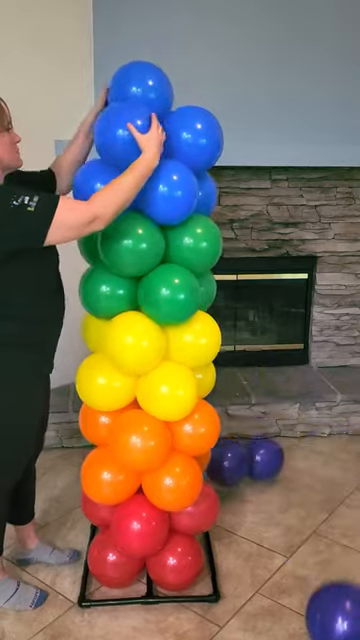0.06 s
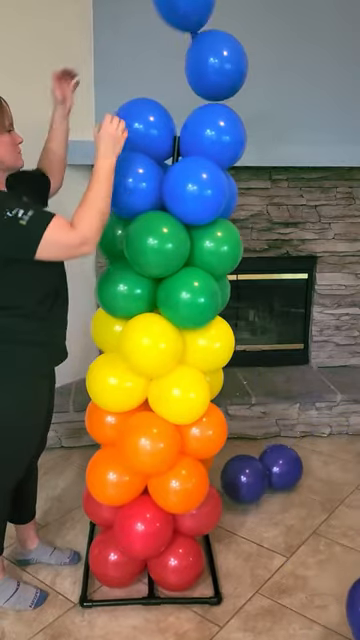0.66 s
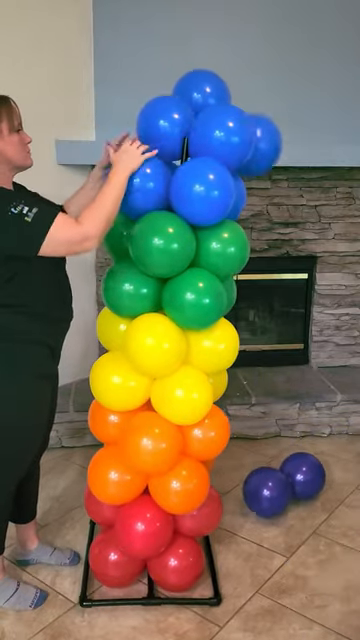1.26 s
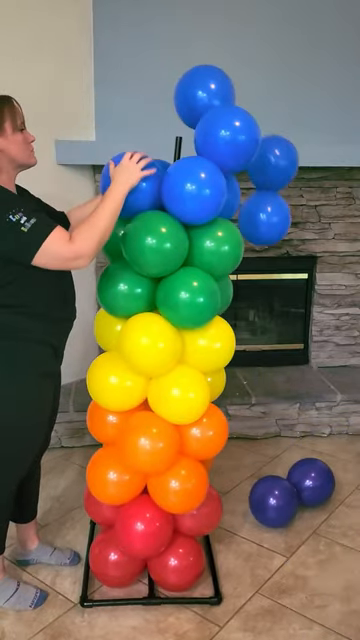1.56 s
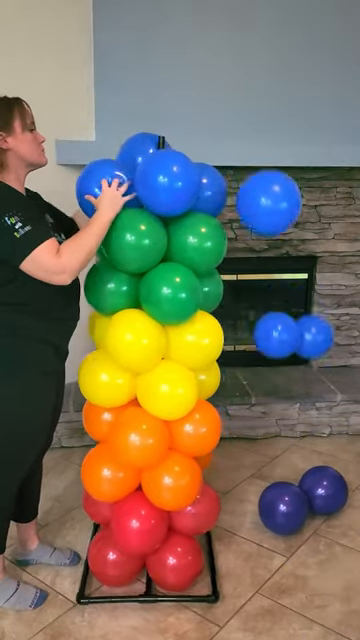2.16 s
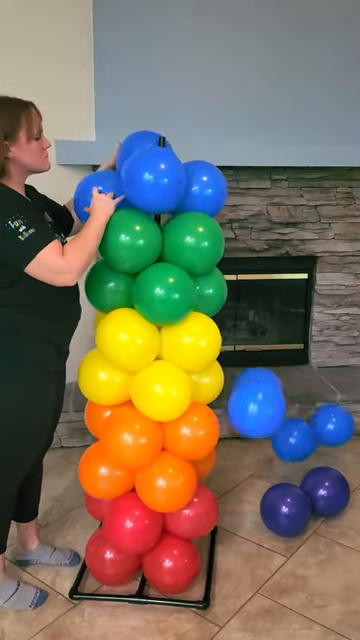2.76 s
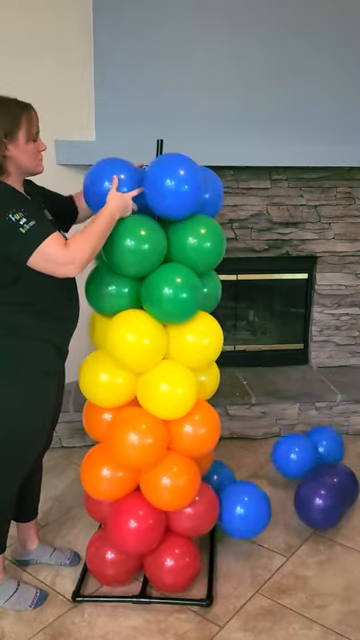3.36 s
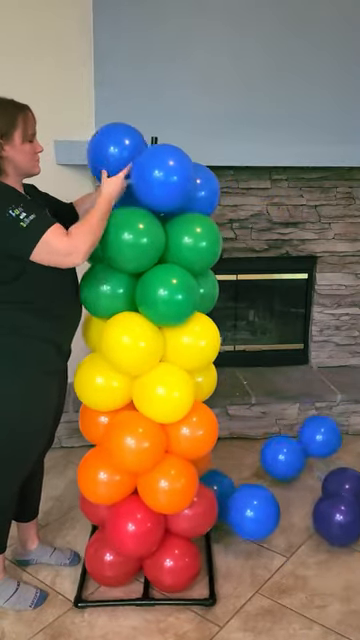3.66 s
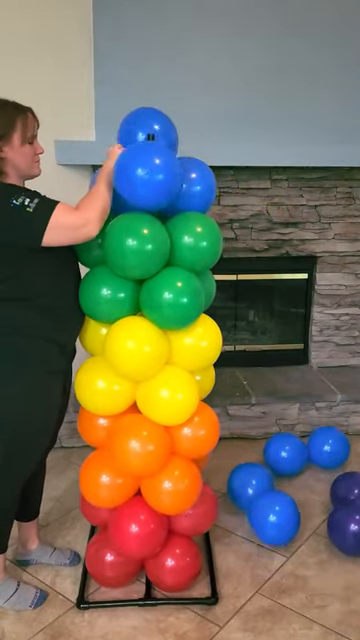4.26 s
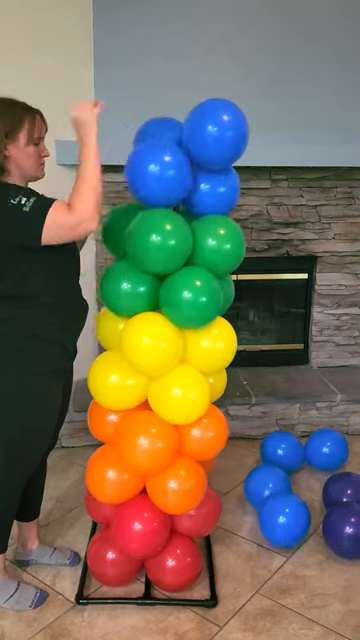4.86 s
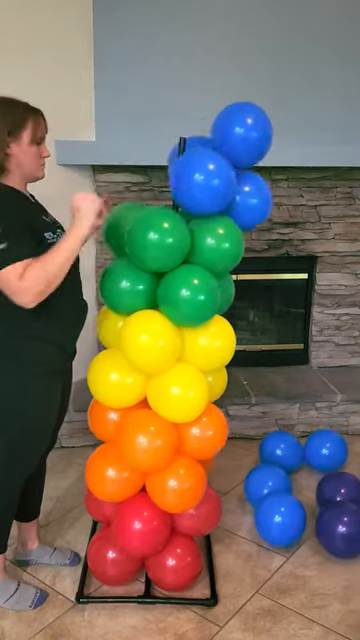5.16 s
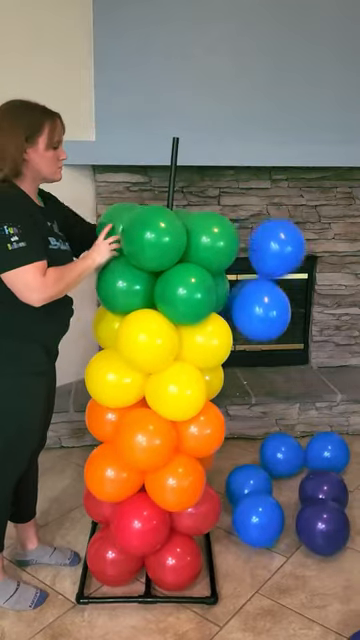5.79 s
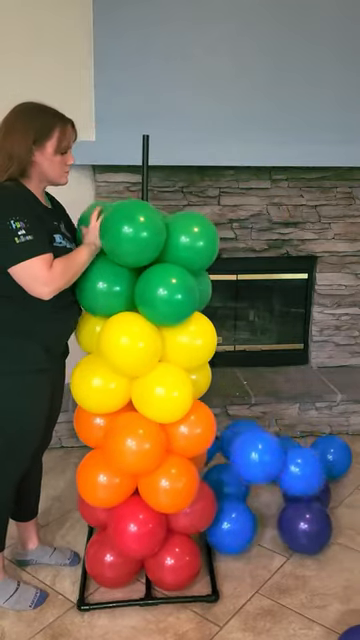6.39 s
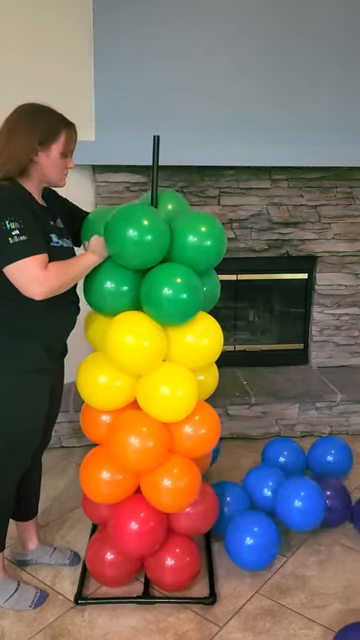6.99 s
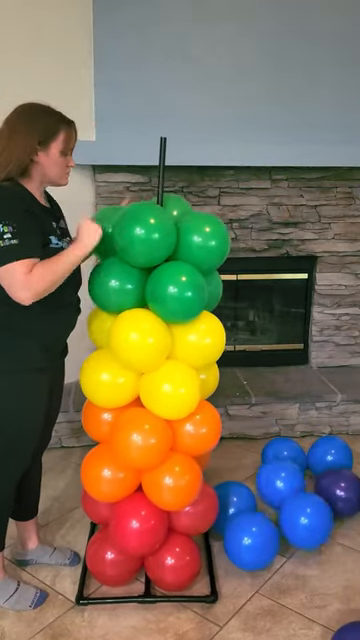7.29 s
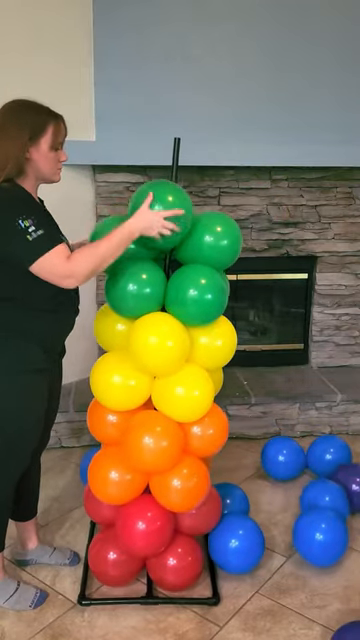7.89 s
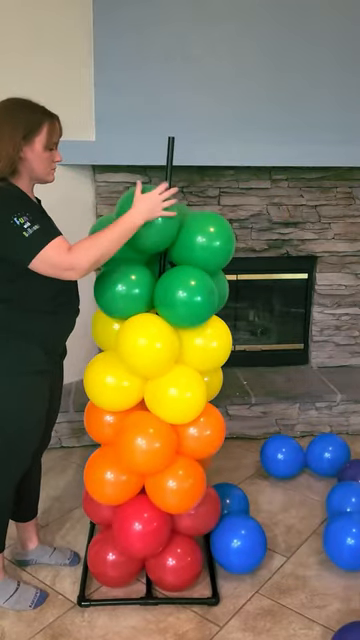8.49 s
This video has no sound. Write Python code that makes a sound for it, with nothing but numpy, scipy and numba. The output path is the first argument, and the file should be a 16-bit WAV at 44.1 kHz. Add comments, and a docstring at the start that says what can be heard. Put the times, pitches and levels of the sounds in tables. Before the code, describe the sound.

Inflated latex balloons are worked off a pole in a ringing tiled room. They rub in short, boomy, rasping strokes, with an early sharp snap and knocks. After a lull the rubbing builds, with hissing hand slides, thin squeaks and a loud low groan. It eases, then returns with a hard juddering pull. A faint appliance hum runs underneath, and the microphone hears plenty of the room.

```python
"""Balloons worked off a pole

Clusters of inflated latex balloons are worked up and off a pole in a tiled living room. Skin sticks
and slips on skin: the slips boom in the balloons, rasp on the latex and now and then lock into a groan
or squeak. Hands brush the skins, balloons wobble, snap free and knock, taut patches scrape and the
hardest pull judders. The room rings with it all, and an appliance hums underneath."""
import sys
import numpy as np
from scipy import signal
from scipy.fft import rfft, irfft
from scipy.io import wavfile
from scipy.ndimage import uniform_filter1d
from numba import njit

SR = 44100
rng = np.random.default_rng(int(sys.argv[2]) if len(sys.argv) > 2 else 0)


def persist_wave(psi):
    """Save psi, clipped to +-1, as 16-bit WAV."""
    counts = np.round(np.clip(psi, -1, 1) * 32767).astype(np.int16)
    wavfile.write(sys.argv[1], SR, np.atleast_2d(counts).T)


N = 376613
T = np.arange(N) / SR


def undb(db):
    """Decibels to gain."""
    return np.exp(np.asarray(db) * np.log(10) / 20)


def unit_rms(x):
    """Scale to rms 1."""
    return x / np.sqrt(np.mean(x ** 2))


def steady(x, window=2200):
    """Hold the short-term rms near 1 and keep the grain."""
    power = uniform_filter1d(uniform_filter1d(x ** 2, window), window)
    return x / np.sqrt(np.abs(power) + 1e-12)


def wander(hz):
    """Random drift with a spread near 1, turning hz times a second."""
    return np.interp(T * hz, np.arange(N // 10), rng.standard_normal(N // 10))


def add(out, start_s, sound):
    """Mix a sound in at a time."""
    i = int(start_s * SR)
    out[i:i + len(sound)] += sound[:N - i]


def swell(start_s, length_s):
    """Half-sine envelope: the skin speeds up and slows down."""
    out = np.zeros(N)
    add(out, start_s, np.sin(np.pi * T[:int(length_s * SR)] / length_s))
    return out


def along(points, hz):
    """Read (freq_hz, value) points on a log-frequency axis."""
    freq_hz, value = np.transpose(points)
    return np.interp(np.log(np.maximum(hz, 1)), np.log(freq_hz), value)


def colour(x, eq, size=2048):
    """Filter by an EQ curve, as a minimum-phase impulse response of energy 1."""
    gain = undb(along(eq, np.fft.rfftfreq(size, 1 / SR)))
    cepstrum = irfft(np.log(gain))
    cepstrum[1:size // 2] *= 2
    cepstrum[size // 2 + 1:] = 0
    impulse = irfft(np.exp(rfft(cepstrum)))
    return signal.fftconvolve(x, impulse / np.linalg.norm(impulse))[:N]


def soften(x, hz):
    """Second-order low-pass."""
    return signal.sosfilt(signal.butter(2, min(hz, SR / 3), fs=SR, output="sos"), x)


@njit
def resonate(x, hz, width_hz):
    """One resonance with a moving centre, gain 1 there."""
    out, band, low = np.empty(len(x)), 0., 0.
    for i in range(len(x)):
        tuning, damping = np.tan(np.pi * hz[i] / SR), width_hz / hz[i]
        v = (band + tuning * (x[i] + 1e-18 - low)) / (1 + tuning * (tuning + damping))
        band, low = 2 * v - band, low + 2 * tuning * v
        out[i] = damping * v
    return out


def stroke(t, attack_s, hold_s, sag_db_per_s=12, release_db_per_s=420):
    """Envelope of one rub: the skin bites, eases while it is dragged, then lets go."""
    bite = np.sin(np.pi / 2 * np.minimum(t / attack_s, 1))
    released_s = np.maximum(t - attack_s - hold_s, 0)
    return bite * undb(-sag_db_per_s * t - release_db_per_s * released_s)


# Light contact on the column of balloons, easing as each cluster flies: time_s, boom_db, hiss_db
HANDLING = [(0.0, -42.5, -51.5), (0.56, -38.5, -56.5), (0.92, -56.5, -67), (1.11, -60.5, -75),
            (1.59, -51.0, -67), (1.63, -64.0, -87), (2.13, -50.0, -53.5), (2.98, -45.5, -67),
            (3.38, -48.0, -60.0), (3.84, -38.0, -53.5), (4.88, -45.0, -56.5), (5.27, -63, -84),
            (5.62, -63.5, -70), (5.66, -69.0, -88.5), (6.28, -38.5, -57.0), (6.96, -45.0, -62.0),
            (7.5, -54.5, -77.5), (7.88, -44.0, -54.5), (8.5, -46.0, -60)]
# A balloon is dragged over its neighbour: start_s, attack_s, hold_s, boom_db, rasp_db
STROKES = [(0.0, 0.004, 0.17, -32.0, -40), (0.183, 0.03, 0.036, -35.0, -47),
           (0.293, 0.029, 0.0076, -32.0, -43), (0.409, 0.027, 0.019, -35, -42),
           (0.646, 0.032, 0.16, -47.5, -59), (1.1, 0.05, 0.07, -48, -70),
           (1.366, 0.022, 0.062, -49.0, -53.5), (1.768, 0.025, 0.17, -56.5, -55),
           (2.029, 0.046, 0.044, -34.0, -40), (2.141, 0.027, 0.15, -41.5, -40.5),
           (2.348, 0.042, 0.051, -38.5, -41.5), (2.723, 0.036, 0.09, -39.0, -42.5),
           (3.058, 0.026, 0.009, -34.5, -40.5), (3.128, 0.021, 0.013, -40.0, -43.5),
           (3.268, 0.021, 0.0052, -40.0, -45), (3.408, 0.028, 0.12, -37.0, -39.5),
           (3.606, 0.044, 0.053, -33.0, -35), (3.799, 0.039, 0.049, -37.0, -40),
           (3.9, 0.025, 0.047, -30, -34), (4.009, 0.028, 0.029, -29.5, -34),
           (4.059, 0.023, 0.022, -31, -34), (4.119, 0.024, 0.042, -34.5, -44),
           (4.344, 0.036, 0.022, -40.5, -40), (4.485, 0.051, 0.03, -41.0, -35.5),
           (4.531, 0.025, 0.027, -31.5, -37.5), (4.636, 0.022, 0.11, -37.5, -42),
           (5.96, 0.08, 0.067, -45.5, -46.5), (6.14, 0.075, 0.045, -33.5, -37.5),
           (6.402, 0.035, 0.045, -35.0, -37), (6.48, 0.033, 0.024, -30.5, -37),
           (6.732, 0.046, 0.031, -29.0, -31.5), (6.862, 0.03, 0.035, -30.0, -29),
           (6.945, 0.026, 0.016, -32.0, -38.5), (6.996, 0.034, 0.047, -39.0, -41.0),
           (7.255, 0.036, 0.03, -37.5, -45), (7.741, 0.082, 0.025, -34, -42),
           (7.842, 0.026, 0.035, -29, -27.5), (7.945, 0.032, 0.025, -31, -42.5),
           (8.418, 0.045, 0.0062, -30, -32.0)]
# A hand glides over a skin: start_s, length_s, hiss_db
HAND_SLIDES = [(0.097, 0.05, -50), (0.47, 0.15, -49.5), (1.301, 0.17, -59.5), (1.742, 0.22, -62.5),
               (2.033, 0.38, -47.5), (2.46, 0.15, -56), (2.758, 0.13, -61), (2.989, 0.19, -52.0),
               (3.422, 0.34, -45.5), (4.109, 0.39, -53), (4.52, 0.2, -47.5), (4.799, 0.047, -44.0),
               (4.953, 0.09, -57.5), (5.9, 0.36, -59.5), (6.348, 0.23, -50), (6.67, 0.28, -50),
               (7.139, 0.16, -61), (7.73, 0.2, -48.5), (8.121, 0.31, -60), (8.449, 0.13, -53.5)]
def friction(rasp_vs_boom_db=-5.5, hiss_vs_rasp_db=-25):
    """Envelopes of boom, rasp and hiss: handling, strokes and hand slides add in power."""
    time_s, *levels = np.transpose(HANDLING)
    touch_db, brush_db = (np.interp(T, time_s, db) for db in levels)
    boom, rasp, hiss = undb([touch_db, touch_db + rasp_vs_boom_db, brush_db]) ** 2
    for start_s, attack_s, hold_s, boom_db, rasp_db in STROKES:
        grip = stroke(T[:SR], attack_s, hold_s)
        add(boom, start_s, (grip * undb(boom_db)) ** 2)
        add(rasp, start_s, (grip * undb(rasp_db)) ** 2)
        add(hiss, start_s, (grip * undb(rasp_db + hiss_vs_rasp_db)) ** 2)
    for start_s, length_s, hiss_db in HAND_SLIDES:
        hiss += (swell(start_s, length_s) * undb(hiss_db)) ** 2
    return np.sqrt([boom, rasp, hiss])


def slip_rate(force, firm_hz=204.58, firm_db=-33, db_per_octave=70, groan_below_hz=700):
    """Slip rate and unevenness: faster under a firmer rub, nearly even on the pitch of a groan."""
    hz = firm_hz * 2 ** ((20 * np.log10(force) - firm_db) / db_per_octave)
    uneven = np.full(N, .33)
    for start_s, length_s, start_hz, end_hz, *_ in SQUEALS:
        if start_hz < groan_below_hz:  # only low tones take the whole contact along
            on = (T >= start_s) & (T < start_s + length_s)
            hz[on] = np.linspace(start_hz, end_hz, on.sum())
            uneven[on] = .1
    return hz, uneven


def slips(hz, uneven, scatter_db, count=4000):
    """One pulse per slip; an uneven grip scatters both the waits and the sizes."""
    pulses, now_s = np.zeros(N), 0
    for wait, size in rng.standard_normal((count, 2)):
        i = min(int(now_s * SR), N - 1)
        now_s += np.exp(uneven[i] * wait) / hz[i]
        at = int(round(now_s * SR))
        if at < N:
            pulses[at] += undb(scatter_db * np.sqrt(uneven[i]) * size)
    return pulses


def squeeze(depth=.04, rate_hz=9):
    """Drifting pitch ratio: squeezing a balloon shifts its resonances."""
    return 1 + depth * wander(rate_hz)


# Body resonances of the balloons: pitch_hz, width_hz, gain_db
BALLOON_MODES = [(74, 5.4, 4), (150, 49, 0), (266, 13.7, 0.5), (310, 49, 2.5), (384.5, 45, 5.5),
                 (450.7, 17, -2.5), (565, 630, -38), (745, 33, -5.5)]
# Midrange rasp of rubbed latex: freq_hz, gain_db
RASP_EQ = [(350, -24.5), (600, 5.5), (900, 5), (1150, -1.5), (1600, -5), (2300, -9), (3200, -16),
           (4800, -19.5), (14000, -45.5)]
# Bright hiss of sliding latex: freq_hz, gain_db
HISS_EQ = [(1200, -20), (2500, 9), (3800, 6), (5200, 4.5), (7000, 3), (9000, -3), (11000, 3), (12500, 6),
           (14000, -2), (16000, -3.5)]
def rubbing(slide_s=.0011, boom_cutoff_hz=850, rasp_trim_db=.5, hiss_trim_db=2):
    """Slips ring the balloons and rasp the skin; between them the sliding latex hisses."""
    boom_gain, rasp_gain, hiss_gain = friction()
    pulses = slips(*slip_rate(boom_gain), scatter_db=5.5)
    # each slip slides on for a moment, tearing many tiny contacts
    sliding = signal.lfilter([1], [1, -np.exp(-1 / (slide_s * SR))], pulses)
    grit = unit_rms(sliding * rng.standard_normal(N))
    body = sum(undb(gain_db) * resonate(pulses, pitch_hz * squeeze(), float(width_hz))
               for pitch_hz, width_hz, gain_db in BALLOON_MODES)
    boom = soften(body, boom_cutoff_hz)
    rasp = colour(unit_rms(pulses) + grit, RASP_EQ)
    hiss = colour(grit + rng.standard_normal(N), HISS_EQ)
    spurts = undb(3 * wander(55))  # the contact catches and lets go
    return (steady(boom) * boom_gain
            + steady(rasp * spurts) * rasp_gain * undb(rasp_trim_db)
            + steady(hiss * spurts) * hiss_gain * undb(hiss_trim_db))


def appliance_hum(pitch_hz=120, rms_db=-50.3, waver_db=1.6):
    """An appliance's mains hum, wavering a little in level."""
    return np.sqrt(2) * np.sin(2 * np.pi * pitch_hz * T) * undb(rms_db + waver_db * wander(15))


# Soft, bass-heavy room tone: freq_hz, gain_db
AIR_EQ = [(25, -26), (36, 1), (50, -2.5), (68, -1), (95, -5), (200, -7.5), (330, -5), (550, -22.5),
          (1000, -27), (3000, -49.5), (6000, -39), (9000, -44.5), (12300, -35.5), (15500, -52)]
def room_air(mid_db=-54.5, wide_above_hz=450):
    """A stereo bed of air, its bass alike in both ears."""
    mid, side = (colour(rng.standard_normal(N), AIR_EQ) * undb(.5 * wander(22)) for _ in range(2))
    side = signal.sosfilt(signal.butter(1, wide_above_hz, "high", fs=SR, output="sos"), side)
    return undb(mid_db) * np.array([mid + side, mid - side])


# Low thumps as the column is jolted: start_s, pitch_hz, level_db, t60_s
THUMPS = [(0.123, 68.5, -29, 0.35), (0.446, 72, -28, 0.25), (0.446, 155, -22, 0.095), (3.69, 64, -35, 0.3),
          (4.012, 290, -23, 0.2), (4.91, 66.6, -37, 0.22), (6.525, 68, -34, 0.26),
          (7.618, 150, -30.5, 0.17), (7.775, 62.2, -33.5, 0.42), (7.868, 77.92, -31.5, 0.57)]
def thumps(rise_s=.003):
    """Big soft skins wobble: low sines that swell within a cycle and die away."""
    out, t = np.zeros(N), T[:SR]
    for start_s, pitch_hz, level_db, t60_s in THUMPS:
        envelope = (1 - np.exp(-t / rise_s)) * undb(level_db - 60 * t / t60_s)
        add(out, start_s, np.sin(2 * np.pi * pitch_hz * t) * envelope)
    return out


def slap(flutter_gain, flutter_s):
    """A sharp blow, then a brief flutter of the slapping skin; energy 1."""
    t = T[:SR // 10]
    flutter = rng.standard_normal(len(t)) * np.exp(-t / flutter_s)
    push = (t == 0) + flutter_gain * flutter / np.linalg.norm(flutter)
    return push / np.linalg.norm(push)


# Skin snaps free: start_s, level_db
SNAPS = [(.423, -15), (.428, -6)]
def snaps():
    """Stuck latex peels off with a short bright tick."""
    out = np.zeros(N)
    for start_s, level_db in SNAPS:
        add(out, start_s, undb(level_db) * slap(flutter_gain=.39, flutter_s=.0066))
    return colour(out, HISS_EQ)


# Tone of a balloon knock: freq_hz, gain_db
KNOCK_EQ = [(100, -26), (260, -1), (450, -3), (900, -3), (1900, -2.5), (3200, -8.5), (4400, -9.5),
            (6000, -20), (15000, -34)]
# Balloons knock together: start_s, level_db, cutoff_hz
KNOCKS = [(.434, -5, 450), (.464, 2, 4200), (.471, -6, 4000), (2.735, -10, 1000), (3.067, -8, 1300),
          (3.303, -6.5, 1300), (3.44, -5, 1900), (4.906, -4.5, 1300), (5.562, -24.5, 1300),
          (6.947, -6, 1500), (7.066, -9, 1400), (7.162, -10.5, 1100), (8.436, -6.5, 900)]
def knocks():
    """Skin meets skin; a lower cutoff makes a softer, duller blow."""
    out = np.zeros(N)
    for start_s, level_db, cutoff_hz in KNOCKS:
        blow = slap(flutter_gain=.7, flutter_s=.006)
        add(out, start_s, undb(level_db) * soften(blow, cutoff_hz))
    return colour(out, KNOCK_EQ)


# Low groans, and high squeaks from small taut patches:
# start_s, length_s, start_hz, end_hz, level_db, octave_gain_db, waver_ratio
SQUEALS = [(2.13, .14, 2380, 2560, -50, -14, .03), (3.92, .155, 368, 364, -17.5, -23, .02),
           (4.06, .06, 560, 500, -27, -18, .16), (4.635, .07, 3300, 3480, -45.5, -12, .03),
           (4.793, .042, 3500, 4150, -42, -8, .035), (4.96, .08, 8200, 7900, -59, -30, .07),
           (6.19, .17, 440, 480, -41, -12, .1), (6.775, .04, 440, 415, -29, -22, .05),
           (8.445, .09, 428, 415, -28, -18, .05)]
def squeals():
    """Locked stick-slip: a gliding tone and its octave, unsteady in pitch and strength."""
    out = np.zeros(N)
    jitter, grip = wander(400), undb(1.8 * wander(90))
    for start_s, length_s, start_hz, end_hz, level_db, octave_gain_db, waver_ratio in SQUEALS:
        on = (T >= start_s) & (T < start_s + length_s)
        progress = (T[on] - start_s) / length_s
        glide_hz = start_hz + (end_hz - start_hz) * progress
        phase = 2 * np.pi * np.cumsum(glide_hz * (1 + waver_ratio * jitter[on])) / SR
        tone = np.sin(phase) + undb(octave_gain_db) * np.sin(2 * phase)
        out[on] += undb(level_db) * np.sin(np.pi * progress) * grip[on] * tone
    return out


# Short, gritty scrapes: start_s, length_s, centre_hz, level_db
SCRAPES = [(3.61, .045, 4400, -37), (4.055, .055, 2100, -35.5), (4.525, .08, 1900, -47),
           (4.77, .04, 2700, -52), (7.845, .05, 3900, -41)]
def scrapes(slips_per_s=1200, width_ratio=.6):
    """Dense tiny slips ring a small taut patch of latex."""
    grit = (rng.random(N) < slips_per_s / SR) * rng.standard_normal(N)
    out, bend = np.zeros(N), squeeze()
    for start_s, length_s, centre_hz, level_db in SCRAPES:
        patch = resonate(grit, centre_hz * bend, float(width_ratio * centre_hz))
        out += steady(soften(patch, 1.5 * centre_hz)) * swell(start_s, length_s) * undb(level_db)
    return out


# Low-mid body of one heavy jerk: freq_hz, gain_db
JUDDER_EQ = [(140, -16), (240, 2), (440, 1), (600, -16), (950, -16), (2500, -36), (9000, -55)]
def judder(start_s=7.805, length_s=.205, rate_hz=220, level_db=-24, wobble_hz=74, wobble_db=6):
    """The hardest pull: a big skin slips in nearly even jerks as the column's wobble works the grip."""
    pulses = slips(np.full(N, rate_hz), uneven=np.full(N, .028), scatter_db=10)
    grip = undb(wobble_db * np.sin(2 * np.pi * wobble_hz * T))
    jerks = colour(pulses * grip, JUDDER_EQ)
    return steady(jerks) * swell(start_s, length_s) * undb(level_db)


# Decay time of the tiled room: freq_hz, t60_s
ROOM_DECAY = [(100, 0.5), (400, 0.7), (3000, 0.62), (14000, 0.43)]
def room_tail(predelay_s=.0015, build_s=.0036, near_wall_gain=.94, near_wall_s=.012):
    """Spectrum of one diffuse tail: strong echoes from near walls, then each band dies at its own rate."""
    t, hz = T[:SR], np.fft.rfftfreq(SR, 1 / SR)
    centres = np.geomspace(60, 16000, 5)
    build = 1 - np.exp(-np.maximum(t - predelay_s, 0) / build_s)
    onset = build * (1 + near_wall_gain * np.exp(-t / near_wall_s))
    noise, tail = rfft(rng.standard_normal(SR)), 0
    for centre, weights in zip(centres, np.eye(len(centres))):
        fade = onset * undb(-60 * t / along(ROOM_DECAY, centre))
        band = irfft(noise * along(np.column_stack([centres, weights]), hz))
        tail = tail + band * fade / np.linalg.norm(fade)
    return rfft(tail)


# Reverb level against the direct sound: freq_hz, wet_db
ROOM_WET = [(70, -1), (200, 2), (400, -4), (1000, 7), (4000, 8.5)]
# Stereo balance: freq_hz, left_minus_right_db
BALANCE = [(120, -1), (300, -2.5), (2000, 0), (9000, -4)]
def tiled_room(x, facing, facing_db=-7, right_lag_s=.0001, wide_above_hz=350):
    """Direct sound, with extra from sources facing the listener, then the ring of tile and stone."""
    hz = np.fft.rfftfreq(SR, 1 / SR)
    ears = np.array([[1], [-1]])  # left, right
    wet = undb(along(ROOM_WET, hz))
    gain = undb(ears * along(BALANCE, hz) / 2) / np.sqrt(1 + wet ** 2)
    lead = SR // 100  # samples of space for the filters' pre-ring

    def hear(source, paths):
        """Carry a source to both ears."""
        impulse = np.roll(irfft(paths * gain), lead, axis=1)
        return signal.fftconvolve(source[None], impulse, axes=1)[:, lead:lead + N]

    direct = np.exp(-2j * np.pi * hz * right_lag_s * (ears < 0))
    out = hear(x + undb(facing_db) * facing, direct)
    alike = 1 / (1 + (hz / wide_above_hz) ** 4)  # long waves reach both ears alike
    # the sound wanders among four balloons, each with its own echoes
    places = np.array([wander(35) for _ in range(4)])
    for share in places / np.linalg.norm(places, axis=0):
        mid = room_tail() * np.sqrt((1 + alike) / 2)
        side = room_tail() * np.sqrt((1 - alike) / 2)
        out += hear(x * share, wet * (mid + ears * side))
    return out


def scene():
    """All the balloon sounds share one room, over a bed of hum and air."""
    facing = knocks() + snaps() + squeals() + scrapes()
    balloons = rubbing() + judder() + thumps() + facing
    return tiled_room(balloons, facing) + appliance_hum() + room_air()


def record(dry, cutoff_hz=15800):
    """A steep low-pass takes off the very top."""
    return signal.sosfilt(signal.ellip(10, .2, 70, cutoff_hz, fs=SR, output="sos"), dry)


dry = scene()
out = record(dry)
persist_wave(out)
```